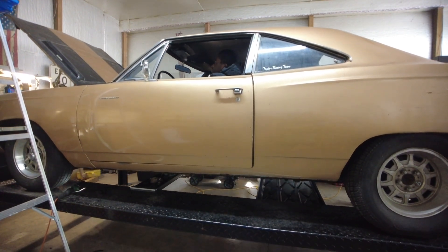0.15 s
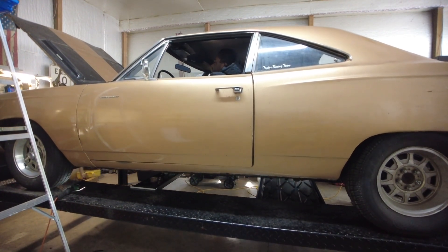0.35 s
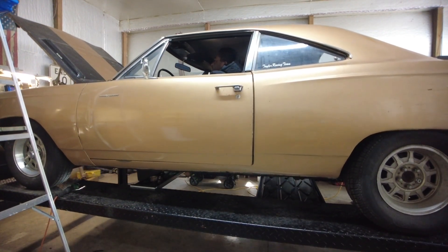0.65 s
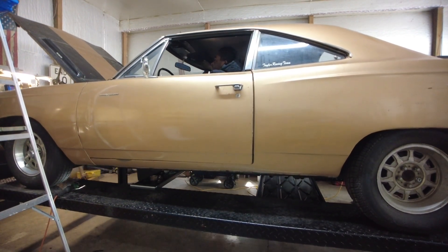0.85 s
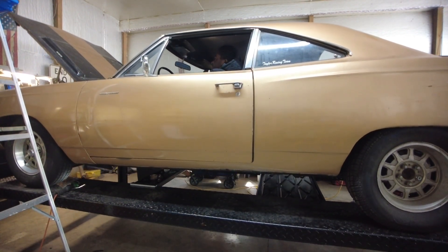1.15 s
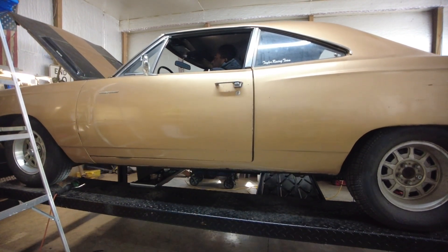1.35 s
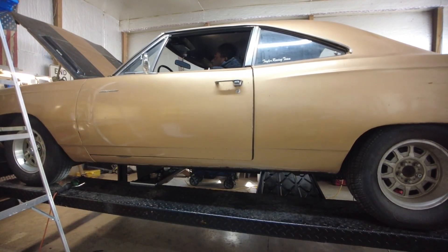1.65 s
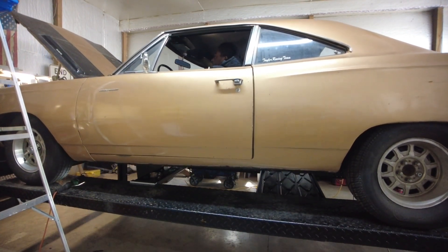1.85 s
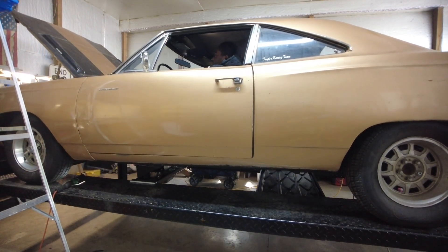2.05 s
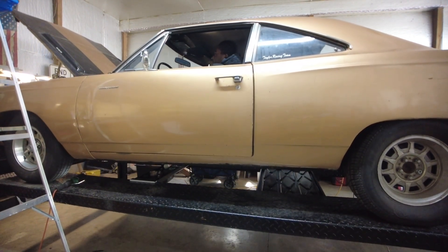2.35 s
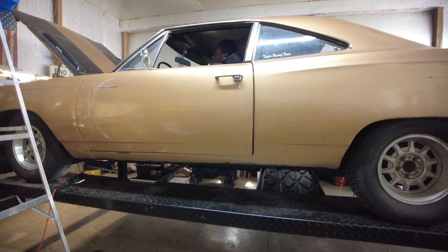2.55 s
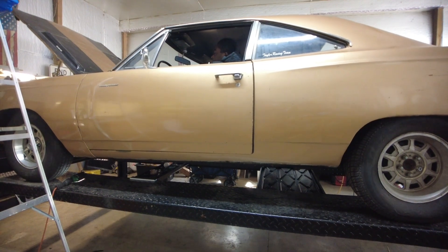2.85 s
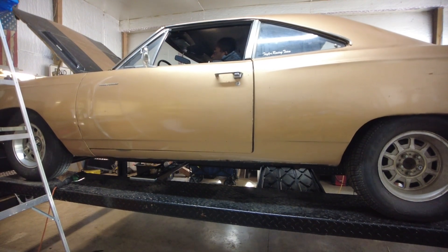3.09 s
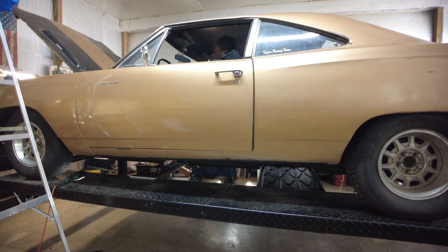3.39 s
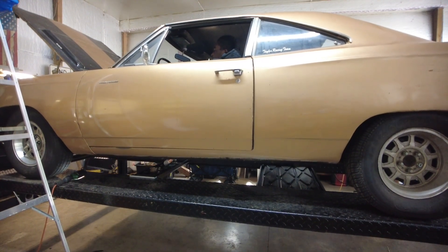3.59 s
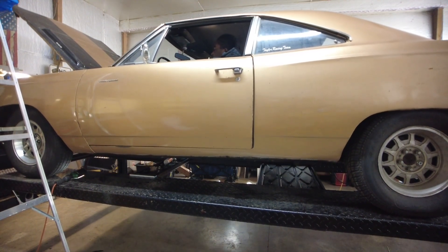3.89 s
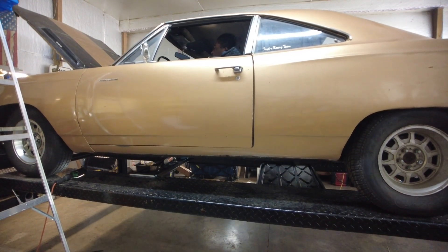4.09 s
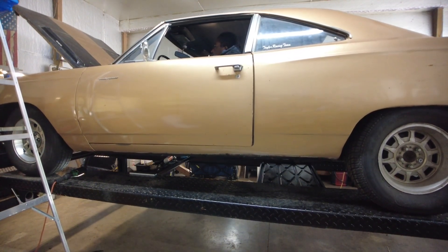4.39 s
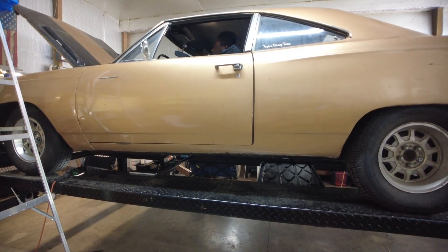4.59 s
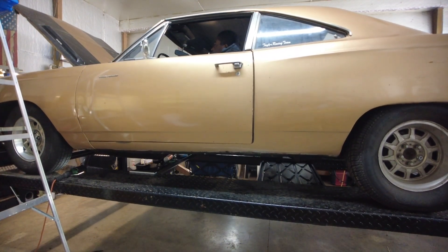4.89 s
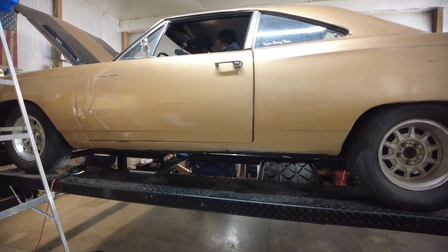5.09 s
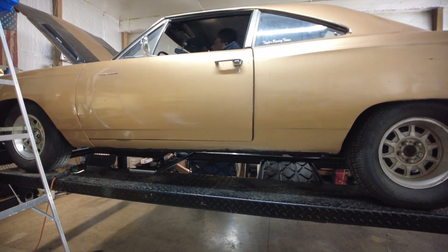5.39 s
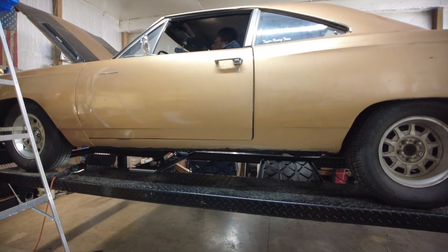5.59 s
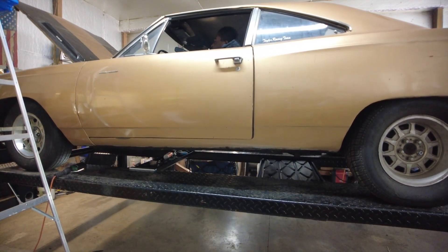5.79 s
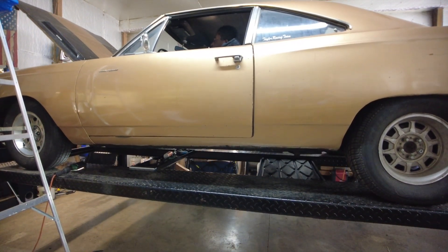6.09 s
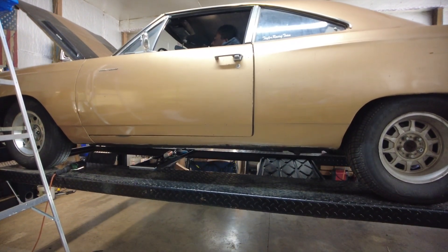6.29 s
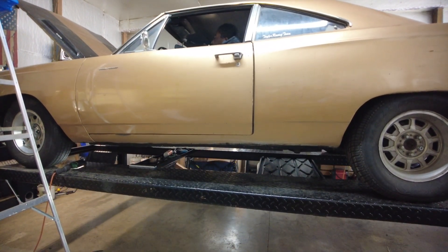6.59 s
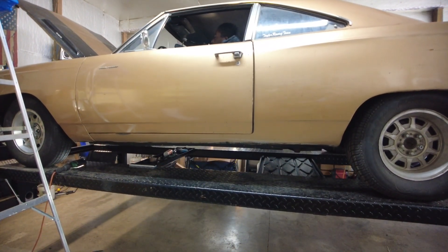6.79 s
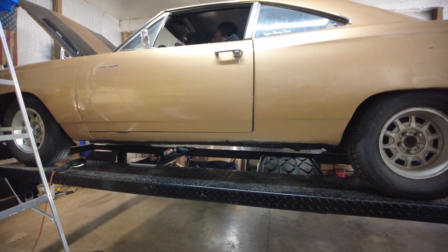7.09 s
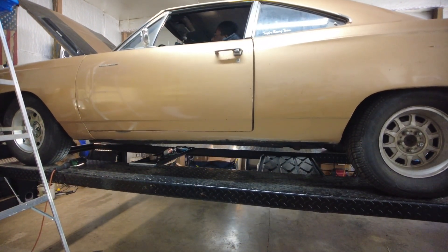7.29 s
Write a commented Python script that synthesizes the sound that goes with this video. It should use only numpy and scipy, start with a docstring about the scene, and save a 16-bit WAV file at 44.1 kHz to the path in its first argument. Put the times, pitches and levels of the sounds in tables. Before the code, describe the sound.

Electric lift machinery drones and whines as it raises a car, with sharp metallic latch clacks echoing briefly around a hard-walled garage.

```python
"""A low drone, a hum and a soft rush come first; after half a second steel clacks, and clacks keep returning.
A four-post lift is raising a car in a home garage: the drones are sine tones of the loaded frame, the hum
is steady motor tones with a fan tone, and the rush is filtered noise. The gear pump whines in a comb of tones,
some of which swell and fade as echoes off the rising car slip in and out of step with the direct sound.
Two safety pawls in turn drop past lock rungs: each blow is a noise crack plus the ringing of a steel post."""
import sys
import numpy as np
from scipy import signal
from scipy.fft import rfft, irfft, next_fast_len
from scipy.io import wavfile
from scipy.ndimage import uniform_filter1d

SR = 44100
rng = np.random.default_rng(int(sys.argv[2]) if len(sys.argv) > 2 else 0)


def to_wav(s):
    """Save 16-bit WAV."""
    ch = np.atleast_2d(s).T  # columns
    pcm = np.round(np.clip(ch, -1, 1) * 32767)  # PCM
    wavfile.write(sys.argv[1], SR, pcm.astype(np.int16))


N = 328545

# rumble of the room, its colour before the level curve: [f/Hz, level/dB per Hz]
RUMBLE_COLOUR = [(15, -15), (30, -15), (46, -2.5), (70, -4), (105, 0.5), (130, -5.5), (155, -8),
                 (200, -10.5), (280, -16), (500, -39.5)]
# rush of oil and cooling air, its colour before the level curve: [f/Hz, level/dB per Hz]
RUSH_COLOUR = [(200, -14), (300, -12), (550, -5.5), (650, -12), (1050, -6.5), (1400, -15), (1650, -17),
               (1950, -19), (2600, -12.5), (4200, -20), (6400, -18.5), (7200, -22), (10500, -32.5),
               (12500, -22), (16000, -58)]
# how loud both are over time, the rush before its flicker: [t/s, rumble level/dB, rush level/dB]
BED_LEVELS = [(0, -45, -49.5), (1.5, -45.5, -48), (3, -44.5, -49), (4.5, -44.5, -48), (6, -44.5, -50),
              (7.45, -44.5, -48)]
# how alike the room sounds left and right: [f/Hz, correlation -1 to 1]
ROOM_LIKENESS = [(60, 0.99), (300, 1), (700, 0.86), (1200, -0.22), (1850, -0.87), (2800, 0.48),
                 (4200, 0.43), (6000, -0.63), (9000, -0.14), (15000, -0.28)]

# steady tones of the motor: [f/Hz, level/dB]
MOTOR_TONES = [(120, -54.5), (240, -59.5), (480, -64.5), (700, -63.5), (720, -63.5), (736, -68), (840, -78)]
# tone of the cooling fan over time: [t/s, level/dB]
FAN_LEVEL = [(0, -56), (1.7, -52.5), (2.4, -58), (3.8, -50), (5, -55.5), (6, -59), (7.45, -61)]
FAN_HZ, HUM_HZ = 786.4, 120

# lower drone of the frame: [t/s, level/dB]
LOW_DRONE_LEVEL = [(0.0, -57), (0.55, -45.5), (2.0, -36), (2.3, -45.5), (2.55, -38), (3.35, -50),
                   (4.95, -52), (5.2, -42), (6.35, -61), (6.45, -45), (7.4, -52)]
# upper drone of the frame, before its trim and throb: [t/s, level/dB]
HIGH_DRONE_LEVEL = [(0.0, -40.5), (1.4, -43), (2.3, -56), (2.95, -40.5), (3.3, -48.5), (4.35, -50.5),
                    (4.5, -41), (5.35, -44), (5.8, -53.1), (6.0, -50), (6.8, -57.5), (7.4, -56)]
# early throb of the upper drone: [depth 0-1, first crest t/s, time between crests/s, lasting/s]
UPPER_THROB = (0.87, 0.1, .24, 2.8)
SETTLE_S = 2.9  # the drones sink in pitch until the cables have taken up the load

# pump: the ripple sets the spacing of its tones, and the whine is the sixth harmonic of the gear mesh
RIPPLE_HZ, TEETH, WHINE_ORDER = 118.51, 9, 54
# gear-mesh tone, before its trim: [t/s, level/dB]
MESH_LEVEL = [(0.0, -52.6), (0.95, -46), (1.15, -43.4), (2.1, -49), (3.95, -43), (4.2, -41.1), (4.65, -35),
              (5.6, -34), (7.4, -37.5)]
# high whine, before its trim: [t/s, level/dB]
WHINE_LEVEL = [(0.0, -58.5), (0.4, -47), (0.9, -59), (1.9, -54), (2.05, -54), (2.35, -51), (3.15, -40.5),
               (4.5, -48.5), (5.3, -52), (5.6, -55), (5.8, -46), (7.4, -51.5)]
# other strong tones of the pump: [multiple of the ripple]
STRONG_ORDERS = [18, 36, 43, 45]
# their swells from an echo off the rising car, one row per tone, before a shared trim:
# [mid-lift level/dB, trend/dB per s, echo share 0-1, first crest t/s, time between crests/s]
STRONG_SWELLS = [(-61, -.3, .42, 1.5, 9.5), (-62, 0, .55, .4, 5.9), (-58.5, 1.0, .5, .13, 1.02),
                 (-54.6, .3, .55, 1.7, 2.72)]
# side tones of the pump, each moved to the nearest ripple multiple: [f/Hz, level/dB]
SIDE_TONES = [(3081, -70), (3200, -68), (4385, -70), (4980, -67), (5216, -63), (5453, -66), (5927, -66),
              (6045, -66), (6163, -59), (6281, -58), (6518, -62), (6637, -59), (6755, -69), (7111, -70),
              (7229, -68), (7348, -69), (7940, -72), (8533, -71), (10666, -67), (11732, -71), (12088, -72),
              (12562, -70), (12681, -65), (12799, -70)]
# outline of the weak tones that fill the other ripple multiples: [f/Hz, level/dB]
WEAK_OUTLINE = [(240, -64.5), (600, -78), (1180, -67), (1500, -74.5), (2600, -109), (3150, -61),
                (3450, -81.5), (4100, -78), (5700, -86), (8200, -75), (9800, -86.5), (12000, -87.5),
                (14000, -108)]

# crack of steel on steel, its colour: [f/Hz, level/dB per Hz]
CRACK_COLOUR = [(100, -35), (250, -11), (370, -11.5), (600, -2.5), (820, -2), (1100, 6), (1400, 5),
                (1900, -10.5), (2700, 2.5), (4500, -1.5), (6300, -0.5), (8300, -3), (11000, -9),
                (15800, -12)]
# how alike the crack sounds left and right: [f/Hz, correlation -1 to 1]
CRACK_LIKENESS = [(300, 1), (800, 0.86), (1250, 0.35), (1900, -0.35), (2800, 0.83), (6000, 0.25),
                  (10000, -0.022), (15000, 0.1)]
# ringing modes of the first post, relative levels: [f/Hz, width/Hz, level/dB]
FIRST_MODES = [(1030, 140, -14), (1213, 42, 8.5), (1320, 18, 8.5), (1510, 97, -2), (1722, 26, 2.5),
               (2010, 91, 2), (2474, 64, -8), (2870, 17, -4), (3274, 180, -9.5), (3880, 31, -3),
               (5070, 91, -4), (5600, 61, -14), (6210, 56, -4.5), (6980, 130, -6.5), (8450, 42, -3)]
# ringing modes of the second post, relative levels: [f/Hz, width/Hz, level/dB]
SECOND_MODES = [(980, 17, -38), (1140, 15, 4), (1222, 48, 5.5), (1520, 63, -3), (1820, 40, 3),
                (2474, 35, 1.5), (2620, 37, -2), (2970, 36, -11), (3290, 110, -8.5), (6080, 190, -9),
                (6410, 98, -7), (7060, 100, -24), (8540, 100, -14)]
# time for the garage's echoes to fall by 60 dB, before the post's own factor: [f/Hz, decay/s]
GARAGE_DECAY = [(150, 1), (400, 0.59), (900, 0.16), (1500, 0.31), (3000, 0.28), (6000, 0.29), (12000, 0.31)]
# how long each post rings: [factor on the garage's decay]
RING_FACTOR = [0.97, 1.224]
# a pawl passes a rung:
# [drop t/s, pawl 0-1, level/dB, boom of low modes/dB, slip ahead of the drop/s, slip level/dB]
RUNG_DROPS = [(.5315, 0, -15.5, 2.2, 0.071, -36.5), (1.4221, 1, -17.5, 4, .0703, -27),
              (3.8069, 0, -15.5, -8, .059, -25.5), (4.7064, 1, -17, 1, .0704, -28),
              (7.1076, 0, -15.5, -6, 0.067, -27)]
# extra contact of each pawl: the first seats heavily after its drop, the second grazes before it:
# [time from the drop/s, level against the drop/dB, brightness f/Hz, boom/dB, left minus right/dB]
EXTRA_CONTACT = [(.0102, -9.5, 3700, 5.5, 5), (-.017, -15.5, 16000, 1, -6.5)]
# separate light ticks: [t/s, pawl 0-1, level/dB, brightness f/Hz, boom/dB]
LIGHT_TICKS = [(.479, 0, -33.5, 1500, 7.5), (1.378, 1, -33, 2480, 2), (4.038, 0, -35.5, 2300, 1.5),
               (7.322, 1, -31, 2700, -6)]
# a pawl rubs along its ladder: [t/s, length/s, level/dB, brightness f/Hz]
LADDER_RUBS = [(0.868, 0.079, -29.5, 2250), (4.115, 0.11, -30.5, 2690)]
SLIP_HZ, SLIP_BOOM_DB, DROP_HZ = 3300, -7, 14500  # the slip is dull and thin, the drop bright
TICK_CRACK_DB = -7  # a light tick rings the post with little crack
BOOM_TOP_HZ = 1600  # modes below this count as boom
CUTOFF_HZ = 16000  # nearly nothing is left above this


def from_db(db):
    """Turn decibels into gain."""
    return 10 ** (np.asarray(db) / 20)


def rms_one(x):
    """Scale to an average strength (rms) of 1."""
    return x / np.sqrt(np.mean(x ** 2) + 1e-20)


def in_time(rows):
    """Draw each column of a time table as a curve, sample by sample."""
    s, *columns = np.transpose(rows)
    return [np.interp(np.arange(N) / SR, s, column) for column in columns]


def at_hz(points, hz):
    """Read a frequency table on a logarithmic frequency axis."""
    table_hz, values = np.array(points).T
    return np.interp(np.log(np.maximum(hz, 1)), np.log(table_hz), values)


def panned(pan_db):
    """Left and right gains; a positive difference makes the left louder."""
    return from_db([[pan_db / 2], [-pan_db / 2]])


def add(out, sound, s):
    """Mix a stereo sound in at a time in seconds."""
    at = round(s * SR)
    out[:, at:at + sound.shape[1]] += sound[:, :N - at]


def low_pass(x, hz):
    """Dull a sound with a second-order low-pass."""
    return signal.sosfilt(signal.butter(2, min(hz, .45 * SR), fs=SR, output="sos"), x)


def drift(rate):
    """A smooth random wander of rms 1; a higher rate wanders faster."""
    step = 200  # samples between the random points
    r = np.exp(-2 * np.pi * rate * step / SR)
    slow = signal.lfilter([1], [1, -2 * r, r * r], rng.standard_normal(N // step + 1002))
    slow = slow[1000:]  # leave out the filter's start
    return np.interp(np.arange(N), step * np.arange(len(slow)), rms_one(slow))


def noise(spectrum, likeness, size):
    """Stereo noise of a given colour, built from a shared middle and an opposed side part."""
    hz = np.arange(size // 2 + 1) * SR / size
    alike = np.clip(at_hz(likeness, hz), -.9, .995)
    colour = rms_one(from_db(at_hz(spectrum, hz)))
    mid, side = rfft(rng.standard_normal((2, size))) * colour
    side = side * np.sqrt((1 - alike) / (1 + alike))
    return irfft(mid, size) + irfft(side, size) * [[1], [-1]]


def resonance(x, hz, width):
    """A two-pole resonance with gain 1 at its peak."""
    r = np.exp(-np.pi * width / SR)
    feedback = [1, -2 * r * np.cos(2 * np.pi * hz / SR), r * r]
    return signal.lfilter(np.array([1, 0, -1]) * (1 - r * r) / 2, feedback, x)


def standing_wave(phase, scatter, apart=0.33, rate=.45):
    """A tone at both ears: shifting reflections wander its strength and its phase between the ears."""
    count = int(2 * rate * N / SR) + 8
    slow = signal.resample(rng.standard_normal((3, count)), 256, axis=-1)[:, :160]
    strength = rms_one(abs(1 + scatter * (slow[0] + 1j * slow[1])))
    ear_phase = apart * rms_one(slow[2]) * np.array([[1], [-1]])
    paths = strength * np.exp(1j * ear_phase)
    where = np.linspace(0, paths.shape[1] - 1, N)
    carrier = np.sqrt(2) * np.exp(1j * phase)
    return np.array([(np.interp(where, np.arange(len(p)), p) * carrier).real for p in paths])


def bed(flicker_db=1.1):
    """Room rumble and the rush of oil and air: two filtered noises, the rush flickering in level."""
    rumble_db, rush_db = in_time(BED_LEVELS)
    size = next_fast_len(N)
    rumble = noise(RUMBLE_COLOUR, ROOM_LIKENESS, size)[:, :N] * panned(pan_db=0.5)
    rush = noise(RUSH_COLOUR, ROOM_LIKENESS, size)[:, :N]
    return from_db(rumble_db) * rumble + from_db(rush_db + flicker_db * drift(21)) * rush


def motor(scatter=0.87):
    """Magnetic hum at fixed pitches, plus the tone of the cooling fan."""
    turn = 2 * np.pi * np.arange(N) / SR
    hum = sum(from_db(db) * standing_wave(hz * turn, scatter) for hz, db in MOTOR_TONES)
    fan = from_db(in_time(FAN_LEVEL)[0]) * standing_wave(FAN_HZ * turn, scatter=0.24)
    return hum + fan * panned(pan_db=1.5)


def throb(depth, crest_s, period_s, lasting_s):
    """A regular beat from two close tones, growing and then dying away."""
    t = np.arange(N) / SR
    share = depth * np.sin(np.pi * np.minimum(t / lasting_s, 1))
    beat = abs(1 + share * np.exp(2j * np.pi * (t - crest_s) / period_s))
    return beat / np.sqrt(1 + share ** 2)


def drone(levels, start_hz, settled_hz, gain_db, rough):
    """A frame tone that sinks as the cables take up the load, shaken unevenly by their friction."""
    hz = np.interp(np.arange(N) / SR, [0, SETTLE_S], [start_hz, settled_hz])
    shake = (1 + rough * (drift(7.4) + 1j * drift(2.8))) / np.sqrt(1 + 2 * rough ** 2)
    tone = (shake * np.exp(2j * np.pi * np.cumsum(hz) / SR)).real
    return np.sqrt(2) * from_db(gain_db + in_time(levels)[0]) * tone


def frame():
    """The loaded frame resonates in a lower drone and a throbbing upper one."""
    low = drone(LOW_DRONE_LEVEL, start_hz=83.4, settled_hz=76.5, gain_db=0.0, rough=0.41)
    high = drone(HIGH_DRONE_LEVEL, start_hz=186.3, settled_hz=170.6, gain_db=-0.54, rough=0.38)
    return low * panned(pan_db=3.5) + throb(*UPPER_THROB) * high * panned(pan_db=1.5)


def two_paths(level_db, trend_db, echo, crest_s, period_s):
    """Gain of a tone that arrives directly and by an echo whose path changes steadily."""
    t = np.arange(N) / SR
    swell = abs(1 + echo * np.exp(2j * np.pi * (t - crest_s) / period_s))
    return from_db(level_db + trend_db * (t - t.mean())) * swell


def buzz(phase, skipped, spread=0.45):
    """The weak tones at all unskipped ripple multiples, as one cycle repeated."""
    orders = np.setdiff1d(np.arange(2, 118), skipped)
    angles = rng.uniform(0, 2 * np.pi, len(orders)) + rng.normal(0, spread, (2, len(orders)))
    lines = np.zeros((2, 2049), complex)
    lines[:, orders] = from_db(at_hz(WEAK_OUTLINE, orders * RIPPLE_HZ)) * np.exp(1j * angles)
    cycle = irfft(lines, norm="forward") / np.sqrt(2)
    angle = np.linspace(0, 2 * np.pi, cycle.shape[1], endpoint=False)
    return np.array([np.interp(phase, angle, side, period=2 * np.pi) for side in cycle])


def pump(scatter=0.89, flutter=0.00031, wander=.0001, flicker_rate=24,
         beat_db=-14, mesh_db=0.0, whine_db=0.26, overtone_db=0.7):
    """Gear teeth mesh nine times a ripple; the ripple puts a comb of tones round each mesh harmonic."""
    speed = RIPPLE_HZ * (1 + wander * drift(0.298) + flutter * drift(25))
    phase = 2 * np.pi * np.cumsum(speed) / SR

    def any_start(order):
        return order * phase + rng.uniform(0, 2 * np.pi)

    # the motor slips behind the mains, so the mesh tone beats with the nearest hum harmonic
    hum_phase = TEETH * 2 * np.pi * HUM_HZ * np.arange(N) / SR + .5 * drift(2.5)
    hum = np.sqrt(2) * np.cos(hum_phase)
    mesh = standing_wave(TEETH * phase, scatter=0, apart=0.46)
    out = from_db(mesh_db + in_time(MESH_LEVEL)[0]) * (mesh + from_db(beat_db) * hum)

    # the second mesh harmonic flutters into a narrow hiss
    second_gain, *upper_gains = [from_db(overtone_db) * two_paths(*row) for row in STRONG_SWELLS]
    shake = drift(flicker_rate) + 1j * drift(flicker_rate)
    second = standing_wave(STRONG_ORDERS[0] * phase + np.angle(shake), scatter=0, apart=1.0)
    out += second_gain * rms_one(abs(shake)) * second
    for order, gain in zip(STRONG_ORDERS[1:], upper_gains):
        out += gain * standing_wave(any_start(order), scatter=0.12, apart=0.58)

    whine = standing_wave(any_start(WHINE_ORDER), scatter=0, apart=0.55)
    out += from_db(whine_db + in_time(WHINE_LEVEL)[0]) * whine
    side_tones = {round(hz / RIPPLE_HZ): db for hz, db in SIDE_TONES}
    out += buzz(phase, [TEETH, WHINE_ORDER, *STRONG_ORDERS, *side_tones])
    for order, db in side_tones.items():
        out += from_db(db) * standing_wave(any_start(order), scatter, apart=0.44, rate=.7)
    return out * panned(pan_db=-1.0)


def echoing_crack(sustain, rise_s, build_cycles, grain_db, grain_s):
    """A crack carried by the garage: noise bands that build up and die at their own speeds."""
    t = np.arange(SR) / SR
    hz = np.arange(SR // 2 + 1)
    echoes = rfft(noise(CRACK_COLOUR, CRACK_LIKENESS, SR))
    centres = np.geomspace(125, 16000, 8)
    crack = 0
    for centre, share in zip(centres, np.eye(len(centres))):
        band = irfft(echoes * at_hz(np.c_[centres, share], hz), SR)
        build = 1 - np.exp(-t / (rise_s + build_cycles / centre))  # lows take longer to build up
        decay_s = sustain * at_hz(GARAGE_DECAY, centre)
        crack = crack + band * build * np.exp(-np.log(1000) * t / decay_s)
    # the first reflections arrive one by one, later ones merge
    lumps = rms_one(uniform_filter1d(rng.standard_normal(SR), size=60))
    return crack * from_db(grain_db * lumps * np.exp(-t / grain_s))


def post_response(modes, boom_db, sustain, harder_db, modes_db=9.0, crack_db=-1.0, rise_s=0.00086,
                  build_cycles=3.5, grain_db=1.77, grain_s=0.055, direct_db=-7.0, swell_s=0.0037):
    """One blow on a post as the garage carries it: a crack, and modes of the steel rung by that crack."""
    t = np.arange(SR) / SR
    crack = echoing_crack(sustain, rise_s, build_cycles, grain_db, grain_s)
    ring = 0
    for mode_hz, width, db in modes:
        sound = rms_one(resonance(crack, mode_hz, width))
        if mode_hz < BOOM_TOP_HZ:
            # the whole post flexes: its low modes also reach the ear directly, as a short knock
            angle = rng.uniform(0, 2 * np.pi) + rng.normal(0, 0.2, (2, 1))
            envelope = (1 - np.exp(-t / swell_s)) * np.exp(-np.pi * width * t / 2)
            knock = np.sin(2 * np.pi * mode_hz * t + angle) * envelope
            sound = from_db(boom_db) * rms_one(sound + from_db(direct_db) * rms_one(knock))
        # each mode takes its width's share of the blow
        ring = ring + np.std(crack) * np.sqrt(width / CUTOFF_HZ) * from_db(db) * sound
    return from_db(crack_db + harder_db) * crack + from_db(modes_db) * ring


def blow(pawl, level_db, bright_hz, boom_db, harder_db=0):
    """One contact of a pawl with its post; a lower brightness dulls it."""
    modes = [FIRST_MODES, SECOND_MODES][pawl]
    response = post_response(modes, boom_db, RING_FACTOR[pawl], harder_db)
    return from_db(level_db) * low_pass(response, bright_hz)


def ladder_rub(length, level_db, bright_hz, slips_per_s=220, rub_boom_db=-1.0):
    """A pawl rubs along its ladder: many tiny random slips ring the first post."""
    size = int(length * SR)
    slips = rng.choice([-1, 1], size) * (rng.random(size) < slips_per_s / SR)
    slips = slips * signal.windows.tukey(size, .3)
    response = post_response(FIRST_MODES, rub_boom_db, RING_FACTOR[0], harder_db=2.5)
    rub = signal.fftconvolve(response, [slips / np.linalg.norm(slips)])
    return from_db(level_db) * low_pass(rub, bright_hz)


def pawls():
    """At each rung a pawl slips, drops and makes an extra contact; there are also ticks and rubs."""
    out = np.zeros((2, N))
    for s, pawl, level_db, boom_db, ahead_s, slip_db in RUNG_DROPS:
        add(out, blow(pawl, slip_db, SLIP_HZ, SLIP_BOOM_DB), s - ahead_s)
        add(out, blow(pawl, level_db, DROP_HZ, boom_db), s)
        offset_s, relative_db, touch_hz, touch_boom_db, pan_db = EXTRA_CONTACT[pawl]
        touch = blow(pawl, level_db + relative_db, touch_hz, touch_boom_db)
        add(out, touch * panned(pan_db), s + offset_s)
    for s, pawl, level_db, bright_hz, boom_db in LIGHT_TICKS:
        add(out, blow(pawl, level_db, bright_hz, boom_db, TICK_CRACK_DB), s)
    for s, length, level_db, bright_hz in LADDER_RUBS:
        add(out, ladder_rub(length, level_db, bright_hz), s)
    return out


def scene():
    """Room, motor, frame, pump and pawls together."""
    return bed() + motor() + frame() + pump() + pawls()


def record(dry):
    """Cut the top of the sound steeply."""
    return signal.sosfilt(signal.ellip(10, .2, 80, CUTOFF_HZ, fs=SR, output="sos"), dry)


dry = scene()
out = record(dry)
to_wav(out)
```